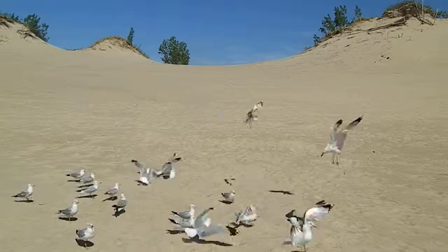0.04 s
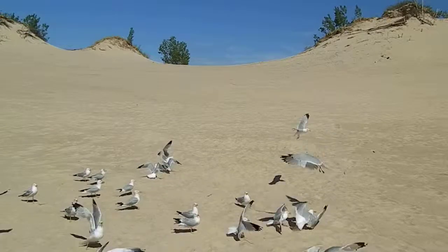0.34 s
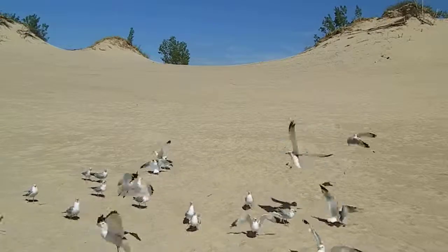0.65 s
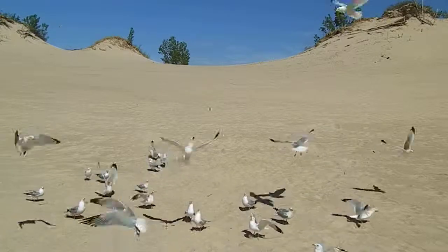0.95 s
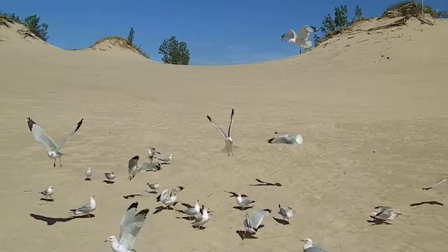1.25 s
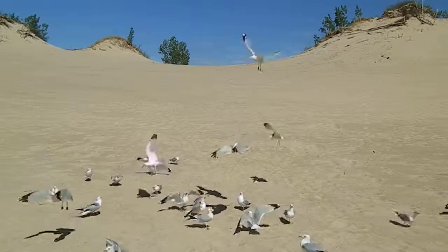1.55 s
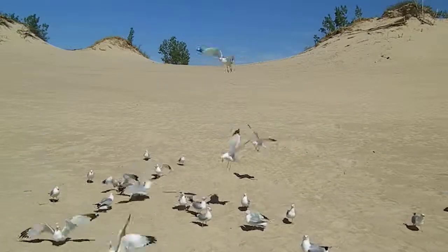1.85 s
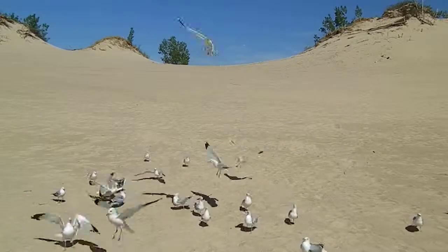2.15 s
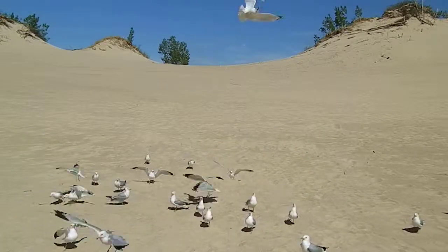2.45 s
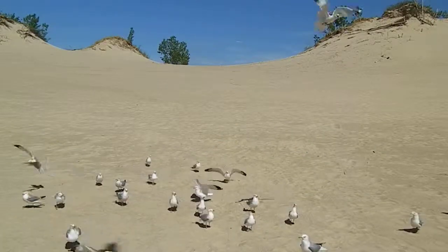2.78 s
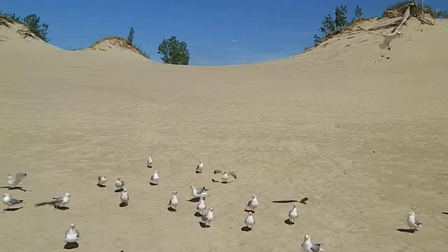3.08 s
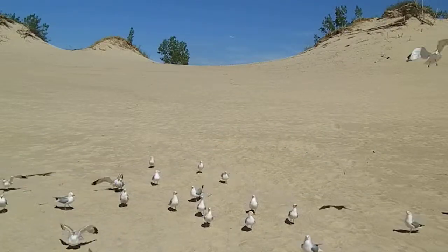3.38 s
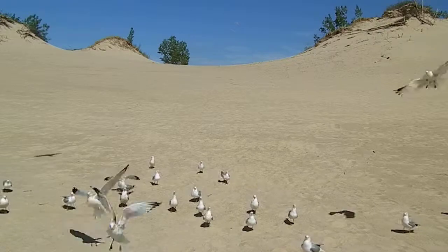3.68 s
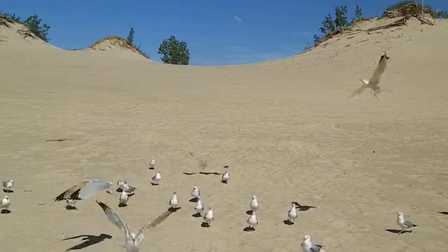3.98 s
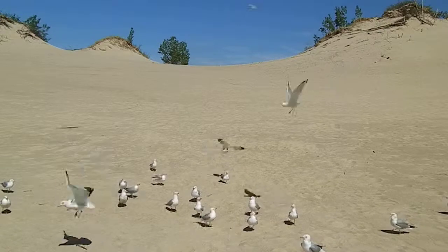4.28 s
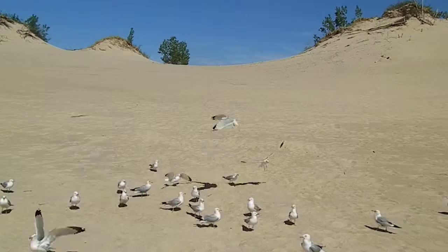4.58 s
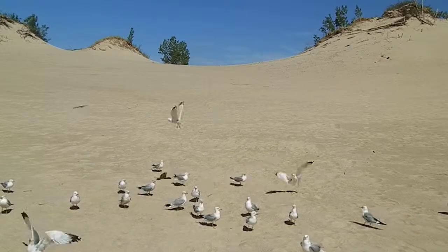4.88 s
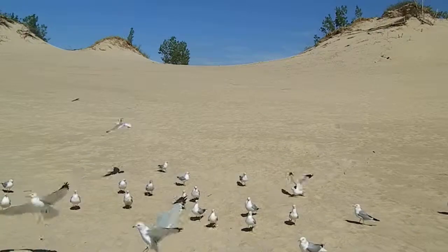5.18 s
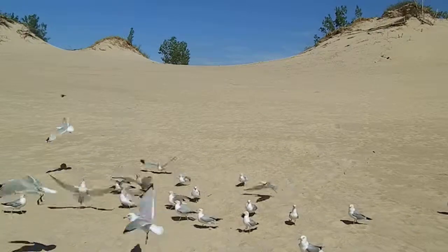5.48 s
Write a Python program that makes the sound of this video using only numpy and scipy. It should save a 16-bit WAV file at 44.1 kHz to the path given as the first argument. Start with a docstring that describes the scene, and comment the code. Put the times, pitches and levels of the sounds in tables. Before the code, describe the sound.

Low, thumping wind gusts die down, leaving a crinkling bag and a squealing gull call after some faint short yelps.

```python
"""Gulls squabbling over food on a sand dune: a few short yelps, then one long arched squeal.
Each call is the pulsing of the syrinx, coloured by throat and bill; the soft sand returns little echo.
Wind buffets the camera microphone for three seconds, over blown sand and the wash of the shore.
Its hardest blows trip the limiter, which ducks everything, hiss included. As the wind drops, something
close by, probably a food bag, crinkles and is shaken once, puffing air at the microphone."""
import sys
import numpy as np
from scipy import signal
from scipy.fft import rfft, irfft, next_fast_len
from scipy.io import wavfile
from scipy.ndimage import uniform_filter1d

SR = 44100
rng = np.random.default_rng(int(sys.argv[2]) if len(sys.argv) > 2 else 0)


def to_wav(s):
    """Save 16-bit WAV."""
    ch = np.atleast_2d(s).T  # columns
    pcm = np.round(np.clip(ch, -1, 1) * 32767)  # PCM
    wavfile.write(sys.argv[1], SR, pcm.astype(np.int16))


N = 248283
TIME = np.arange(N) / SR
BAND_EDGE_HZ = 15950

# short calls, bill nearly shut:
# start_s, length_s, top_pitch_hz, effort_db, bass_db, treble_db, throat_scale, bill_hz
YELPS = [(-.022, 0.11, 540, -30.5, -8.5, -19, 1.05, 1750), (1.129, 0.018, 602, -31.5, -3, -19, 0.8, 1900),
         (1.951, .03, 474, -27, -18, -12, 0.805, 3450), (3.374, 0.015, 556, -37.5, -17, -16, 1.04, 1700)]
# resonances of a gull's throat, before each call scales them: centre_hz, width_hz, gain_db
THROAT_RESONANCES = [(644, 310, -1), (1140, 1130, -4), (1810, 340, 2), (2420, 170, -19), (3100, 350, -9.5),
                     (5000, 770, -11.5), (8150, 660, -7.5), (8980, 530, -8), (10660, 850, -14)]
# the breeze between gusts, dying away after three seconds: time_s, level_db
BREEZE = [(0, -18), (.15, -26.5), (.3, -23), (.46, -23.5), (.66, -19.5), (1.2, -25.5), (1.45, -23),
          (1.77, -26), (2.1, -21), (2.68, -23), (2.85, -17), (3.08, -26.5), (3.36, -23), (3.57, -31),
          (3.75, -34), (4.0, -40), (4.8, -39.5), (5.63, -42)]
# wind gusts on the microphone, plus a puff of air from the shaken bag near 5.3 s:
# peak_s, length_s, rumble_db, flutter_db
GUSTS_AND_PUFF = [(0.052, 0.07, -13.5, -13.5), (.225, 0.045, -16, -8.5), (.288, 0.039, -22, -5),
                  (0.358, .08, -12.5, -16.5), (0.508, 0.026, -21, -19), (0.58, 0.072, -14.5, -11.5),
                  (0.764, 0.047, -12, -18), (0.939, 0.04, -33, -17), (1.139, 0.04, -20, -23.5),
                  (1.33, 0.051, -35, -23.5), (1.55, 0.17, -22, -21.5), (1.679, 0.03, -19, -21),
                  (1.995, .06, -33, -21), (2.188, 0.1, -28, -20), (2.308, 0.03, -16.5, -14.5),
                  (2.439, 0.038, -22, -15.5), (2.566, 0.14, -19.5, -19), (2.744, 0.039, -13, -12),
                  (3.382, .12, -22, -32.5), (3.768, 0.081, -29, -55), (4.33, 0.039, -33, -60),
                  (5.295, 0.039, -48, -29.5)]
# large eddies on the microphone: frequency_hz, gain_db
RUMBLE_SPECTRUM = [(8, -3.5), (20, -4), (35, 3), (70, 0), (115, 0.5), (145, -9), (220, -51)]
# nearly still air on the microphone: frequency_hz, gain_db
CALM_SPECTRUM = [(8, -8), (20, -2), (55, 4), (85, -5.5), (130, -8), (220, -41)]
# small eddies on the microphone: frequency_hz, gain_db
FLUTTER_SPECTRUM = [(85, -33), (130, 1), (170, 0.5), (230, -6), (310, -12.5), (450, -25), (650, -41.5),
                    (1000, -57), (2000, -71), (5000, -93)]
# thumps on the microphone, from wind and, near 5.3 s, the shaken bag's puff: peak_s, peak_db, pitch_hz
THUMPS = [(.039, -3.5, 171), (.195, 2.5, 75), (.206, 5.5, 115), (.221, -3.5, 420), (.264, 2, 83.5),
          (.281, 1.5, 275), (.286, -9, 570), (0.508, -2, 131), (0.595, -5, 105.7), (.752, -6, 138),
          (.777, -3, 118), (.932, -6, 188), (2.019, -8, 89), (2.200, -5, 145), (2.555, -9, 120),
          (2.729, -3.5, 89), (2.747, 6.5, 178), (5.144, -22, 60.5), (5.278, -21, 380), (5.286, -9.5, 360),
          (5.291, -16, 520), (5.297, -15, 400), (5.323, -17.5, 550)]
# fizz of sand blowing over the dune: time_s, level_db
SAND_LEVELS = [(0, -42.5), (.6, -41.5), (1.0, -47.5), (1.7, -46.5), (2.0, -44.5), (2.7, -46.5),
               (2.95, -50.5), (3.3, -58), (3.9, -47), (5.63, -51)]
# colour of that fizz: frequency_hz, gain_db
SAND_SPECTRUM = [(300, 2), (1500, -2.5), (3500, -5.5), (6500, 1.5), (8600, 3), (10300, 1.5), (12500, -3),
                 (15500, -7)]
# steady wash of the shore: frequency_hz, gain_db
SHORE_SPECTRUM = [(100, 4.5), (400, 8.5), (900, 2), (1600, -5), (3500, -9), (8500, -13), (12000, -22),
                  (15500, -25)]
# moves of the bag, each swelling and dying away: peak_s, rise_s, fall_s, level_db
BAG_MOVES = [(.66, 0.041, 0.04, -41.5), (2.03, 0.08, .05, -46), (3.03, 0.23, .12, -42.5),
             (3.89, 0.24, 0.081, -40.5), (4.12, 0.054, .05, -43), (4.37, 0.019, 0.1, -42),
             (5.2, .15, .08, -43.5), (5.32, 0.09, 0.052, -32.5), (5.55, 0.31, .2, -44)]
# colour of the bag's rustle: frequency_hz, gain_db
BAG_SPECTRUM = [(150, -2), (400, 7.5), (1000, 3), (2600, 1.5), (5000, -1.5), (8000, -2), (11000, -6.5),
                (15500, -10)]
# single creases snapping: start_s, peak_db, centre_hz, t60_s
CRINKLES = [(1.791, -26, 5960, 0.03), (1.853, -27.5, 5500, .012), (1.996, -18, 5000, 0.0057),
            (2.041, -27, 5200, .025), (2.859, -21, 2500, 0.014), (3.033, -19, 7200, .016),
            (3.092, -29.5, 2980, .035), (3.167, -21.5, 3450, 0.016), (3.275, -23.5, 5000, .018),
            (3.291, -27, 3100, .019), (3.365, -20, 4180, 0.0065), (3.889, -15.5, 3350, 0.0069),
            (3.896, -15.5, 3400, .01), (4.119, -23, 5400, .017), (4.347, -21.5, 3280, 0.028),
            (4.365, -23.5, 3800, .012), (4.411, -23.5, 6700, 0.033), (4.441, -24, 3150, .012),
            (4.504, -25, 4200, .015), (4.987, -27.5, 7900, .03), (5.254, -15.5, 3030, 0.0086),
            (5.401, -22, 6600, .01)]
# the long call: time_s, pitch_hz, effort_db, gape (0 bill shut, 1 wide open)
SQUEAL = [(4.534, 419, -34.5, 0.14), (4.551, 535, -28.5, 0.2), (4.570, 585, -29, 0.34),
          (4.605, 503.6, -31.5, 0.28), (4.645, 542, -29, 0.7), (4.679, 623, -27.5, 1),
          (4.761, 658, -26, 0.83), (4.805, 630.5, -25, 0.81), (4.85, 610, -24.5, 1),
          (4.903, 596, -24.5, 0.93), (4.924, 477, -28, 0), (4.950, 371, -30.5, 0)]


def amp(db):
    """Decibels to gain."""
    return 10 ** (np.asarray(db) / 20)


def unit_rms(x):
    """Scales to an rms of 1."""
    return x / np.sqrt(np.mean(x ** 2) + 1e-20)


def curves(rows, t):
    """Each column of a table, joined by straight lines in time."""
    times, *columns = np.transpose(rows)
    return [np.interp(t, times, column) for column in columns]


def add(mix, start_s, sound):
    """Mixes a sound in at a time."""
    part = mix[max(round(start_s * SR), 0):][:len(sound)]
    part += sound[:len(part)]


def coloured(x, spectrum):
    """Gives a signal a spectrum and an rms of 1."""
    hz, db = np.transpose(spectrum)
    size = next_fast_len(len(x), real=True)
    f = np.fft.rfftfreq(size, 1 / SR)
    gain = amp(np.interp(np.log(f + 1), np.log(hz), db))
    return unit_rms(irfft(rfft(x, size) * gain, size)[:len(x)])


def drift(count, hz):
    """Smooth random wander of rms about 1, moving at up to about hz."""
    size = next_fast_len(count + SR // 10, real=True)
    f = np.fft.rfftfreq(size, 1 / SR)
    return unit_rms(irfft(rfft(rng.standard_normal(size)) * np.exp(-(f / hz) ** 2), size))[:count]


def swell(peak_s, rise_s, fall_s):
    """A rounded hump of height 1."""
    return np.exp(-((TIME - peak_s) / np.where(TIME < peak_s, rise_s, fall_s)) ** 2)


def throat(hz, bill_hz, bill_width_hz=250, bill_db=-8.5, valley_db=-42):
    """Complex gain of throat and bill: steep resonances with dark valleys between them."""
    resonances = THROAT_RESONANCES + [(bill_hz, bill_width_hz, bill_db)]
    poles = [(amp(db), 1 + 2j * (hz - centre) / width) for centre, width, db in resonances]
    level = np.sqrt(sum((2 * gain / (1 + abs(pole) ** 2)) ** 2 for gain, pole in poles))
    lag = sum(np.angle(pole) * gain for gain, pole in poles)
    return (level + amp(valley_db)) * np.exp(-1j * lag)


def gull(t, hz, effort_db, bass_db, treble_db, strain, throat_scale, bill_hz,
         bass_hz=1050, treble_hz=4500, attack_s=0.0047, release_s=0.01):
    """The syrinx pulses; under strain, strong and weak beats alternate and add half harmonics."""
    slack = np.clip((520 - hz) / 130, 0, 1)  # at low pitch the membranes loosen and rasp
    jitter = 0.0045 * (1 + 3 * slack + 5 * strain)
    cycles = np.cumsum(hz * (1 + jitter * drift(len(t), 240))) / SR
    doubling = (strain + 0.19 * slack) * (1 + 0.5 * drift(len(t), 120))
    voice = np.zeros(len(t))
    for half in range(2, 56):
        f = half / 2 * hz
        share = doubling if half % 2 else 1
        tilt_db = bass_db / (1 + (f / bass_hz) ** 8) + treble_db / (1 + (treble_hz / f) ** 4)
        nasal_db = -4 * np.exp(-((f - 3970) / 370) ** 2)  # a dip between the throat's resonances
        waver_db = 3 * np.sqrt(np.minimum(f / treble_hz, 2)) * drift(len(t), 18.5)
        resonance = throat(f / throat_scale, bill_hz / throat_scale)
        partial = (resonance * np.exp(1j * np.pi * half * cycles)).real
        voice += share * (f < BAND_EDGE_HZ) * amp(tilt_db + nasal_db + waver_db) * partial
    voice /= np.sqrt(uniform_filter1d(voice ** 2, size=500) + 1e-12)  # effort sets the level below
    # a little air escapes with each pulse
    puffs = rng.standard_normal(len(t)) * (1 + np.cos(2 * np.pi * cycles))
    f = np.fft.rfftfreq(len(t), 1 / SR) + 1
    colour = throat(f, bill_hz.mean()) / (1 + (bass_hz / f) ** 2) / np.hypot(1, f / treble_hz)
    rasp = amp(-24.5 + 13 * slack + 24 * strain) * unit_rms(irfft(rfft(puffs) * colour, len(t)))
    envelope = np.minimum((t - t[0]) / attack_s, 1) * np.minimum((t[-1] - t) / release_s, 1)
    return envelope * amp(effort_db) * (voice + rasp)


def yelp(start_s, length_s, top_hz, effort_db, bass_db, treble_db, throat_scale, bill_hz):
    """A short call flicks up, then sags, fades and breaks up; throat and bill follow the pitch."""
    t = TIME[(TIME >= start_s) & (TIME < start_s + length_s)]
    progress = (t - start_s) / length_s
    bend = np.interp(progress, [0, 0.22, 1], [0.9, 1, 0.67])
    sink = bend ** 0.43
    fade_db = -12.5 * progress ** 2
    strain = 0.33 * progress ** 2
    return t[0], gull(t, top_hz * bend, effort_db + fade_db, bass_db, treble_db,
                      strain, throat_scale * sink, bill_hz * sink)


def dune_echo(calls, echo_db=-27, t60_s=0.16, delay_s=0.008):
    """The calls reach the microphone directly, with a faint, short tail scattered by soft sand."""
    t = np.arange(SR // 2) / SR
    tail = rng.standard_normal(len(t)) * amp(-60 * t / t60_s) * (t > delay_s)
    return calls + amp(echo_db) * signal.fftconvolve(calls, tail / np.linalg.norm(tail))[:N]


def airflow_levels(flutter_growth=1.47):
    """Rumble and flutter in dB: gusts and the bag's puff over a breeze whose flutter grows fastest."""
    breeze_db, = curves(BREEZE, TIME)
    rumble_power = amp(breeze_db) ** 2
    flutter_power = amp(-31 + flutter_growth * (breeze_db + 25.5)) ** 2
    for peak_s, length_s, rumble_db, flutter_db in GUSTS_AND_PUFF:
        surge = swell(peak_s, length_s / 2, length_s / 2)
        rumble_power += surge * amp(rumble_db) ** 2
        flutter_power += surge * amp(flutter_db) ** 2
    return 10 * np.log10(rumble_power), 10 * np.log10(flutter_power)


def turbulence(spectrum, steadiness):
    """Low noise whose chance swells are partly smoothed, so that the airflow's level shapes it."""
    noise = coloured(rng.standard_normal(N), spectrum)
    power = uniform_filter1d(uniform_filter1d(noise ** 2, size=1800), size=1800)
    return unit_rms(noise / (power + 1e-6) ** (steadiness / 2))


def airflow(calm_db=-41, blowing_db=-30, dull_hz=215):
    """Wind and the bag's puff on the microphone: big eddies rumble, small ones flutter, gusts tear."""
    rumble_db, flutter_db = airflow_levels()
    blowing = np.clip((rumble_db - calm_db) / (blowing_db - calm_db), 0, 1)
    rumble = np.sqrt(blowing) * turbulence(RUMBLE_SPECTRUM, steadiness=0.6)
    rumble += np.sqrt(1 - blowing) * turbulence(CALM_SPECTRUM, steadiness=0.16)
    bright = turbulence(FLUTTER_SPECTRUM, steadiness=0.77)
    dull = signal.sosfiltfilt(signal.butter(2, dull_hz, fs=SR, output="sos"), bright)
    brightness = np.interp(flutter_db, [-33, -20], [0.49, 1])
    flutter = dull + brightness * (bright - dull)
    tear = coloured(rng.standard_normal(N), [(200, -11), (450, 7.5), (800, -9.5), (1500, -26), (4000, -65)])
    tear_db = -42 + 1.37 * (flutter_db + 18.5) + 4.2 * drift(N, 61)
    return amp(rumble_db) * rumble + amp(flutter_db - 1) * flutter + amp(tear_db) * tear


def blown_sand(flicker_db=2):
    """Sand blowing over the dune makes a restless fizz."""
    level_db, = curves(SAND_LEVELS, TIME)
    return amp(level_db + flicker_db * drift(N, 42)) * coloured(rng.standard_normal(N), SAND_SPECTRUM)


def shore(level_db=-46.5):
    """The shore lies behind everything as a steady, dull wash."""
    return amp(level_db) * coloured(rng.standard_normal(N), SHORE_SPECTRUM)


def thumps(spread_cycles=0.46):
    """Wind or the bag's puff hits the microphone: a push of pressure with a suck before and after."""
    out = np.zeros(N)
    t = np.arange(-SR // 25, SR // 25) / SR
    for peak_s, peak_db, hz in THUMPS:
        push = amp(peak_db) * np.cos(2 * np.pi * hz * t) * np.exp(-(hz * t / spread_cycles) ** 2)
        out += np.interp(TIME - peak_s, t, push, left=0, right=0)
    return out


def bag_rustle(rest_db=-51.5, creases_per_s=3000, spread_db=3, rub_share=0.59, clump_db=2):
    """Close to the microphone, rubbing and countless tiny creases make the bag rustle."""
    move_power = sum(amp(db) ** 2 * swell(peak_s, rise, fall) for peak_s, rise, fall, db in BAG_MOVES)
    level_db = 10 * np.log10(amp(rest_db) ** 2 + move_power)
    sizes = amp(spread_db * np.minimum(rng.exponential(1, N), 4))
    creases = sizes * (rng.random(N) < creases_per_s / SR)
    # each crease fizzes for about a millisecond, in one of eight ways
    shapes = rng.standard_normal((8, 96)) * np.exp(-np.arange(96) / 25)
    kind = rng.integers(0, len(shapes), N)
    crackle = sum(signal.oaconvolve(creases * (kind == k), shape)[:N] for k, shape in enumerate(shapes))
    envelope = amp(level_db + clump_db * drift(N, 86))
    rubbing = rub_share * rng.standard_normal(N)
    return envelope * coloured(unit_rms(crackle) + rubbing, BAG_SPECTRUM)


def bag_crinkles(relative_width=0.77, rise_s=0.00081, scrape_db=-18, scrape_s=0.004):
    """A single crease scrapes faintly as it bends, then gives way with a snap."""
    out = np.zeros(N)
    t = np.arange(-1024, 2048) / SR
    f = np.fft.rfftfreq(len(t), 1 / SR) + 1
    scrape = amp(scrape_db) * np.exp(-abs(t) / scrape_s)
    onset = np.maximum(np.clip(1 + t / rise_s, 0, 1) ** 2, scrape)
    for start_s, peak_db, hz, t60_s in CRINKLES:
        burst = rng.standard_normal(len(t)) * onset * amp(-60 * np.maximum(t, 0) / t60_s)
        snap = irfft(rfft(burst) / (1 + 1j * (f / hz - hz / f) / relative_width))
        add(out, start_s + t[0], amp(peak_db) * snap / abs(snap).max())
    return out


def squeal(easy_db=-26, thinning=2.5, crack_at_s=4.638, crack_length_s=0.04):
    """The long call: an opening bill raises its resonance and lets out bass and treble."""
    t = np.arange(SQUEAL[0][0], SQUEAL[-1][0], 1 / SR)
    hz, effort_db, gape = curves(SQUEAL, t)
    crack = np.exp(-(2 * (t - crack_at_s) / crack_length_s) ** 2)  # the voice cracks on the way up
    strain = 0.012 + 0.34 * crack
    press_db = gape * (effort_db - easy_db)  # pressing harder thins the fundamental
    bass_db = np.interp(gape, [0, 1], [-8.5, 3.5]) - thinning * press_db
    treble_db = np.interp(gape, [0, 1], [-20.5, 0.5]) + 3 * crack
    throat_scale = np.interp(gape, [0, 1], [0.89, 0.989])
    bill_hz = np.interp(gape, [0, 1], [2880, 5310])
    return t[0], gull(t, hz, effort_db, bass_db, treble_db, strain, throat_scale, bill_hz)


def scene():
    """One microphone on the dune: gulls out on the sand, the bag close by, wind on the capsule."""
    calls = np.zeros(N)
    for row in YELPS:
        add(calls, *yelp(*row))
    add(calls, *squeal())
    mix = dune_echo(calls) + airflow() + blown_sand() + shore() + thumps() + bag_rustle() + bag_crinkles()
    return mix[None]


def record(dry, ceiling_db=-3, step_db=3.3, recovery_db_per_s=18, whine_hz=15734, whine_db=-60.5):
    """The camera's limiter ducks in clicking steps and recovers slowly; a whine and band limit follow."""
    over_db = np.maximum(20 * np.log10(abs(dry[0]) + 1e-9) - ceiling_db, 0)
    stepped_db = step_db * np.ceil(over_db / step_db)
    recovery_db = TIME * recovery_db_per_s
    cut_db = np.maximum.accumulate(stepped_db + recovery_db) - recovery_db
    limited = dry * amp(-uniform_filter1d(cut_db, size=5))
    whine = amp(whine_db) * np.sqrt(2) * np.sin(2 * np.pi * whine_hz * TIME)
    lowpass = signal.firwin(1023, BAND_EDGE_HZ, window=("kaiser", 9), fs=SR)
    return signal.oaconvolve(limited + whine, lowpass[None], "same")


dry = scene()
out = record(dry)
to_wav(out)
```